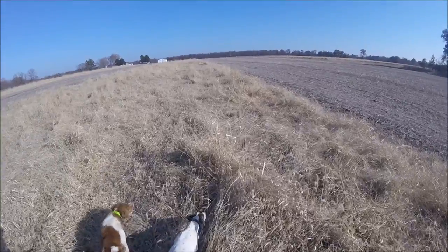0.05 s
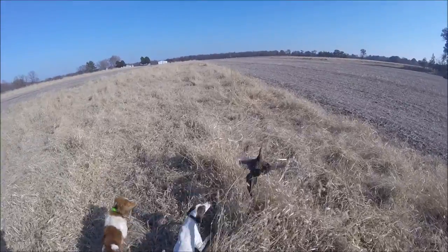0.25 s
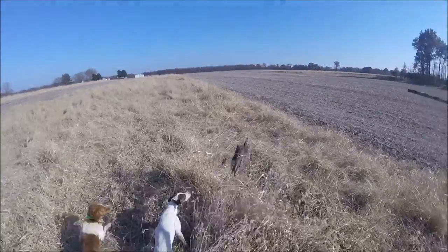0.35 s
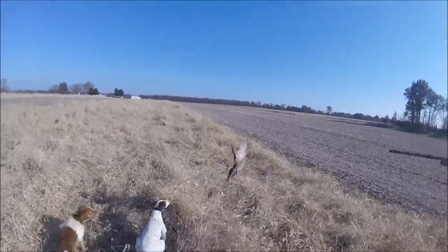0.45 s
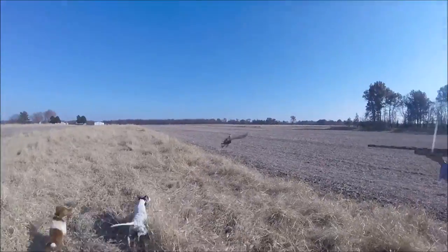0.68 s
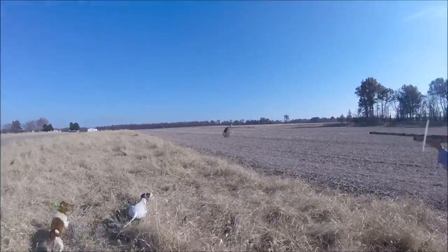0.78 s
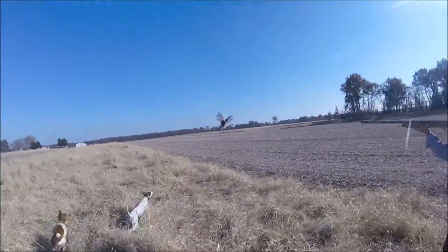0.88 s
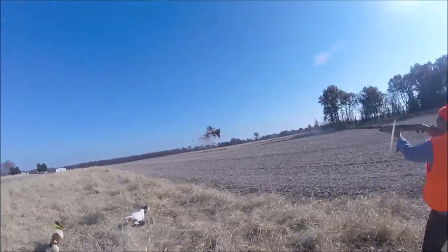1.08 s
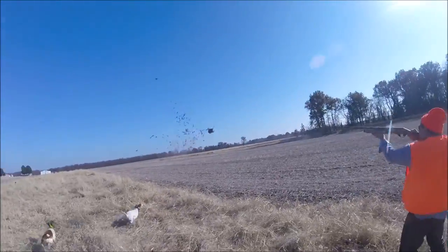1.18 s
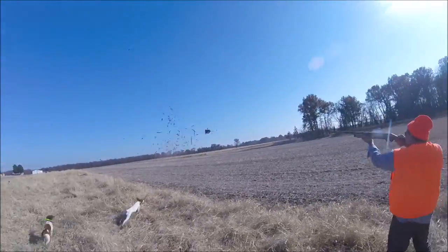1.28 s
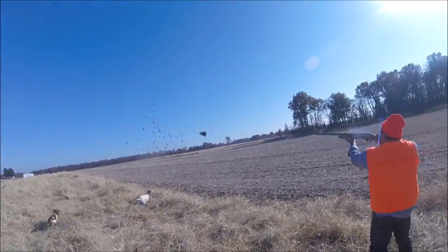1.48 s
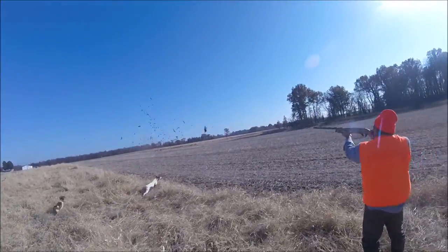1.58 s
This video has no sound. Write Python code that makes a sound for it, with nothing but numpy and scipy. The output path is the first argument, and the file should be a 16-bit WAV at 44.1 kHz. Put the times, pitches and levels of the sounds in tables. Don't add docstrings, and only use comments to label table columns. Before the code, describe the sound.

A game bird flushes from dry grass with a sharp slap and about eleven quick, fading wing claps; stalks hiss and crackle, then one close shotgun blast cracks across an open field, caught by a small cased microphone.

```python
import sys
import numpy as np
from scipy import signal
from scipy.io import wavfile
from scipy.ndimage import uniform_filter1d

SR = 44100
rng = np.random.default_rng(int(sys.argv[2]) if len(sys.argv) > 2 else 0)


def unload_audio(sound):
    columns = np.transpose(np.atleast_2d(sound))
    steps = np.round(np.clip(columns, -1, 1) * 32767)
    wavfile.write(sys.argv[1], SR, steps.astype(np.int16))


def invert_db(level):
    return 10 ** (np.asarray(level, dtype=float) / 20)


N = 72765

# (time [s], clap level [dB], clap pitch [Hz], air push level [dB], feather whistle level [dB])
DOWNSTROKES = [(0.351, -33.5, 650, -32, -44), (0.426, -24.5, 663, -25.5, -35),
               (0.502, -22.5, 695, -28, -34), (0.5755, -21.5, 750, -31, -28),
               (0.649, -26.5, 676, -28.5, -31.5), (0.725, -30, 664, -39.5, -36),
               (0.798, -28, 661, -32.5, -34), (0.873, -34.5, 704, -37, -45), (0.948, -33, 690, -36, -35.5),
               (1.024, -35, 677, -33, -42), (1.1, -41.5, 675, -37.5, -60)]
# (time [s], signed strength [linear], pitch [Hz], decay [s])
STALK_SLAPS = [
    (0.362, -0.098, 45, .02),
    (0.398, -0.52, 397, 0.00091),
    (0.398, 0.21, 80, .014),
    (0.43, 0.06, 42, 0.022),
    (0.5545, -0.1, 350, 0.0033),
    (0.232, -0.047, 340, 0.0026),
    (0.304, -0.043, 330, .008),
    (0.4448, 0.048, 4800, 0.0013),
]
# (delay [s], signed strength [linear], push length [s], dullness [Hz])
BLAST_ARRIVALS = [(0, 8.3, .0008, 9500), (.0006, 3, .0003, 6000), (.0013, 3.5, .0004, 5000),
                  (.0052, 7, .0004, 3200), (.0059, -2.2, .0006, 2200), (.0071, -2.4, .0005, 2200),
                  (.0162, -3, .0008, 1400), (.0203, -2.4, .0008, 1500), (.021, 1.8, .0005, 1800),
                  (.0475, -.4, .004, 2500), (.1272, .4, .004, 2500)]
# (level [dB], decay by 60 dB [s], low edge [Hz], high edge [Hz])
SHOT_TAILS = [
    (5.5, .014, 2500, 3870),
    (5.5, 0.013, 6600, 7800),
    (-7.5, 0.11, 830, 7400),
    (5, .010, 14000, 15500),
    (-16.5, 0.44, 120, 1400),
    (-26.5, 0.62, 690, 1100),
    (-22.5, 0.46, 2000, 5800),
    (-32, 2.9, 152, 385),
]
# (time [s], level [dB], crunch level against the hiss [dB])
RUSTLE_VIGOUR = [(0.0, -37, -13.5), (0.04, -44, -17), (0.102, -43, -21.5), (0.112, -43.5, -43),
                 (0.122, -41, -13), (0.16, -47.5, -9.5), (0.228, -25.5, -7), (0.252, -30, -11),
                 (0.304, -26.5, -9.5), (0.318, -21.5, -11), (0.336, -30, -10.5), (0.498, -31.5, -9.5),
                 (0.594, -25.5, -18), (0.658, -33.5, -11), (0.68, -30, -15.5), (0.88, -29.5, -16),
                 (1.136, -35, -18), (1.155, -36, -16.5)]
# (time [s], level before the limiter [dB])
DOGS_RUN_OFF = [
    (1.2, -16),
    (1.35, -34.5),
    (1.44, -40.5),
    (1.558, -33.5),
    (1.6, -30),
    (1.65, -36),
]
# (frequency [Hz], level per Hz [dB])
GRASS_HISS = [(880, -30), (1500, -17.5), (4270, -10), (5100, -21), (5980, -1), (6630, -2.5), (9910, -7),
              (12500, -56), (14000, -87)]
# (frequency [Hz], level per Hz [dB])
GRASS_CRUNCH = [(59, -27), (100, -6.5), (330, -9), (634, -10.5), (698, -12.5), (1600, -15), (4500, -22),
                (5850, -23), (9900, -120)]
# (frequency [Hz], level per Hz [dB])
BREEZE_TONE = [(20, 12), (70, 6.5), (250, -5), (500, -30), (1500, -27)]
# (frequency [Hz], width [Hz], gain [linear])
CASE_RESONANCES = [(4945, 360, 1.03), (5000, 220, 1.28), (6493, 196, 2.65)]
DROPOUTS = [.112, .687, 1.073, 1.435, 1.605]

SHOT_S, PRIMER_LEAD_S = 1.20455, 0.002


def rms_one(x):
    return x / np.sqrt(np.mean(x ** 2) + 1e-20)


def band(x, low_hz, high_hz):
    edges = [low_hz, min(high_hz, 0.45 * SR)]
    return signal.sosfilt(signal.butter(2, edges, "band", fs=SR, output="sos"), x)


def noise_band(length, low_hz, high_hz):
    return rms_one(band(rng.standard_normal(length), low_hz, high_hz))


def drift(rate_hz):
    r = np.exp(-2 * np.pi * rate_hz / SR)
    wander = signal.lfilter([1], [1, -2 * r, r * r], rng.standard_normal(2 * N))
    return rms_one(wander[N:])


def coloured(whites, spectrum, patchy_db):
    hz, db = np.transpose(spectrum)
    edges = 20 * 2 ** np.arange(0, 9.7, 1 / 3)
    out = 0
    for k, (low, high) in enumerate(zip(edges, edges[1:])):
        level_db = np.interp(np.log(low * high) / 2, np.log(hz), db, left=-60, right=-60)
        flicker = invert_db(level_db + patchy_db * drift(25.8))
        out = out + flicker * band(whites[k % 2], low, high)
    return rms_one(out)


def add(out, s, piece):
    i = int(s * SR)
    out[i:i + len(piece)] += piece[:N - i]


def hump(length_s):
    return np.sin(np.pi * np.linspace(0, 1, int(length_s * SR)) ** 0.52) ** 2


def burst(hz, length_s, fall_hz=0, skew=1):
    u = np.arange(int(length_s * SR)) / (length_s * SR)
    swell = np.sin(np.pi * u ** skew) ** 2
    return swell * np.sin(2 * np.pi * length_s * (hz * u - fall_hz * u * u / 2))


def stalk_slaps():
    out, t = np.zeros(N), np.arange(N // 10) / SR
    for s, strength, hz, decay_s in STALK_SLAPS:
        add(out, s, strength * np.exp(-t / decay_s) * np.sin(2 * np.pi * hz * t))
    return out


def wings():
    clap_s, upstroke_s = 0.0115, 0.0114
    tones, ragged_level, puff_level, push = np.zeros((4, N))
    for s, clap_db, clap_hz, push_db, whistle_db in DOWNSTROKES:
        clap = burst(clap_hz, clap_s, fall_hz=80, skew=0.58)
        whistle = burst(4120, 0.00915, fall_hz=1400)
        upstroke = burst(330, upstroke_s)
        add(tones, s - 0.003, invert_db(clap_db) * clap)
        add(tones, s - 0.001, invert_db(whistle_db) * whistle)
        add(tones, s - 0.023 - upstroke_s / 2, invert_db(clap_db - 11) * upstroke)
        add(ragged_level, s - 0.004, invert_db(clap_db - 11) * hump(1.86 * clap_s))
        add(puff_level, s - 0.003, invert_db(clap_db - 13) * hump(0.012))
        add(push, s - 0.0225, invert_db(push_db + 2.5) * burst(38, 0.066, skew=0.86))
    rough_tones = tones * (1 + 0.28 * drift(340))
    ragged = ragged_level * noise_band(N, 520, 980)
    flutter = puff_level * invert_db(5.1 * drift(280)) * noise_band(N, 1420, 4800)
    rough_push = push * (1 + 0.41 * drift(61))
    return rough_tones + ragged + flutter + rough_push + stalk_slaps()


def shot():
    out, t = np.zeros(N), np.arange(N // 2) / SR
    for delay_s, strength, length_s, dull_hz in BLAST_ARRIVALS:
        r = np.exp(-2 * np.pi * dull_hz / SR)
        front = (1 - 1.03 * t / length_s) * np.exp(-t / length_s)
        dulled = signal.lfilter([(1 - r) ** 2], [1, -2 * r, r * r], front)
        add(out, SHOT_S + delay_s, strength * dulled)
    swell = invert_db(9.5 - 60 * t / 0.081) * np.cos(2 * np.pi * 37.3 * t)
    add(out, SHOT_S, swell)
    for db, t60_s, low_hz, high_hz in SHOT_TAILS:
        add(out, SHOT_S, invert_db(db - 60 * t / t60_s) * noise_band(len(t), low_hz, high_hz))
    answer = np.exp(-((t - 0.272) / 0.019) ** 2)
    add(out, SHOT_S, invert_db(-31) * answer * noise_band(len(t), 180, 332))
    primer = invert_db(-12 - 60 * t / 0.015) * noise_band(len(t), 7500, 14700)
    add(out, SHOT_S - PRIMER_LEAD_S, primer)
    return out


def grass():
    t = np.arange(N) / SR
    s, db, crunch_db = np.transpose(RUSTLE_VIGOUR)
    late_s, late_db = np.transpose(DOGS_RUN_OFF)
    level_db = np.interp(t, np.r_[s, late_s], np.r_[db, late_db]) + 0.79 * drift(26.7)
    snaps_per_s, snap_spread_db, snap_share = 3000, 1, 0.55
    strength = invert_db(snap_spread_db * np.minimum(rng.exponential(1, (2, N)), 5))
    snaps = (rng.random((2, N)) < snaps_per_s / SR) * strength * rng.choice([-1, 1], (2, N))
    whites = snap_share * rms_one(snaps) + rng.standard_normal((2, N))
    hiss = coloured(whites, GRASS_HISS, patchy_db=1)
    crunch_level = invert_db(np.interp(t, s, crunch_db) + 4 + 2.35 * drift(48))
    crunch = crunch_level * coloured(whites[::-1, ::-1], GRASS_CRUNCH, patchy_db=1)
    return invert_db(level_db - 3) * (hiss + crunch + invert_db(-24.5) * sizzle())


def sizzle():
    white, step_hz = rng.standard_normal(N), 220
    out = np.zeros(N)
    for hz in 11560 + step_hz * np.arange(6):
        strip = band(band(white, hz, hz + step_hz), hz, hz + step_hz)
        out += np.clip(4 * drift(10) + 1, 0, 1) * rms_one(strip)
    return out


def wake():
    t = np.arange(N) / SR - 0.36
    fade = invert_db(-33 - 13 * t)
    return np.clip(t / 0.021, 0, 1) * fade * noise_band(N, 27.7, 69)


def breeze():
    return invert_db(-48 + 2 * drift(16)) * coloured(rng.standard_normal((2, N)), BREEZE_TONE, patchy_db=2.5)


def scene():
    field = wings() + grass() + wake() + breeze()
    field_cut = signal.ellip(10, 0.5, 60, 13300 - 200, fs=SR, output="sos")
    return (signal.sosfilt(field_cut, field) + shot())[None]


def microphone(dry):
    x = signal.sosfilt(signal.butter(1, 33, "high", fs=SR, output="sos"), dry)
    x = invert_db(-20) * x + signal.sosfilt(signal.butter(6, 9760, fs=SR, output="sos"), x)
    cased = x
    for hz, width_hz, gain in CASE_RESONANCES:
        r = np.exp(-np.pi * width_hz / SR)
        poles = [1, -2 * r * np.cos(2 * np.pi * hz / SR), r * r]
        cased = cased + gain * signal.lfilter([(1 - r * r) / 2, 0, (r * r - 1) / 2], poles, x)
    return cased


def limiter_gain(t):
    duck_s, duck_db, slide_db_per_s, held_db = 1.1563, -24.5, -900, -22.5
    sliding_db = duck_db + slide_db_per_s * (t - duck_s)
    gain_db = np.where(t < duck_s, 0, np.where(t < SHOT_S - PRIMER_LEAD_S, sliding_db, held_db))
    return uniform_filter1d(invert_db(gain_db), size=24)


def roll_off(x):
    return signal.sosfilt(signal.butter(12, 14560, fs=SR, output="sos"), x)


def record(dry):
    cased, t = microphone(dry), np.arange(N) / SR
    dropout = sum(np.exp(-((t - s) / (0.017 / 2)) ** 4) for s in DROPOUTS)
    middle_band = signal.butter(3, [420, 4600], "band", fs=SR, output="sos")
    thinned = cased - 0.78 * dropout * signal.sosfiltfilt(middle_band, cased)
    ceiling = 1.8
    limited = ceiling * np.tanh(thinned * limiter_gain(t) / ceiling)
    mix = signal.sosfilt(signal.cheby2(8, 60, 16800, fs=SR, output="sos"), limited)
    return roll_off(mix)


dry = scene()
out = record(dry)
unload_audio(out)
```